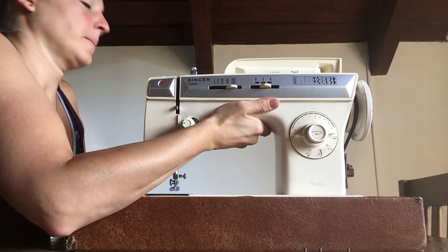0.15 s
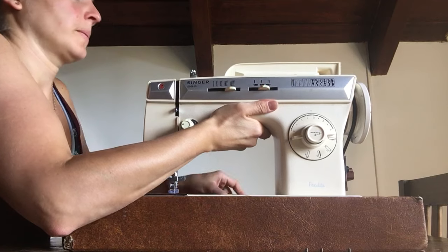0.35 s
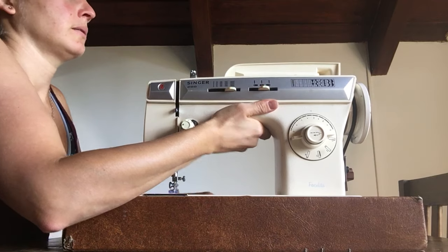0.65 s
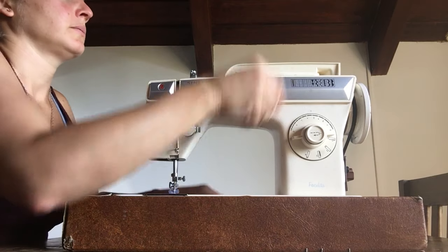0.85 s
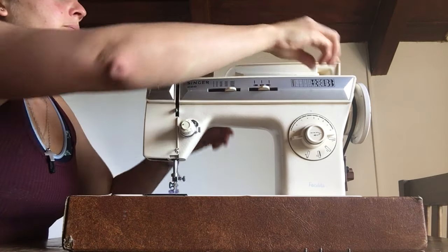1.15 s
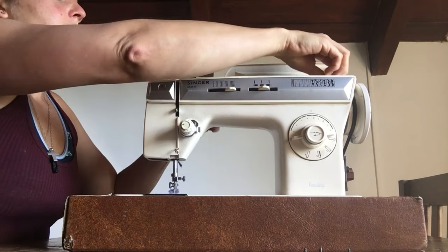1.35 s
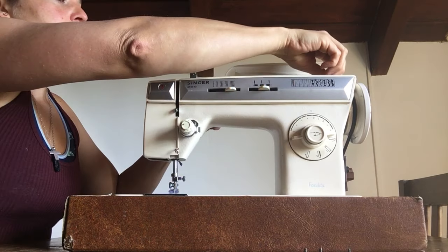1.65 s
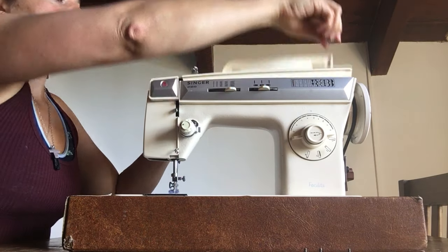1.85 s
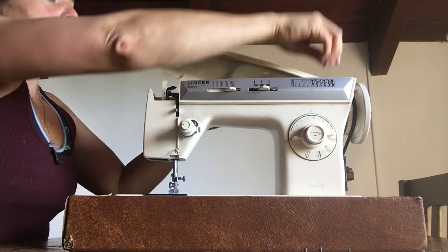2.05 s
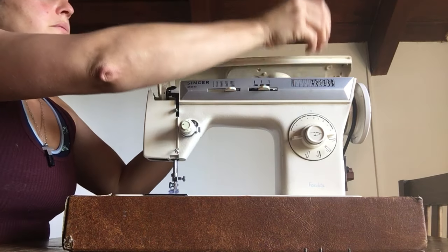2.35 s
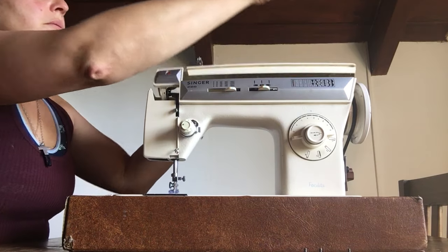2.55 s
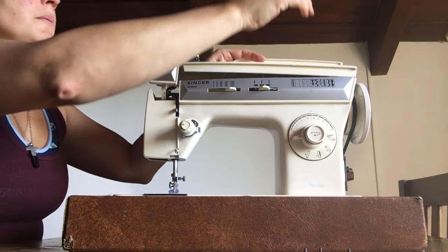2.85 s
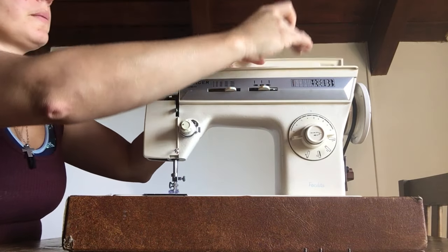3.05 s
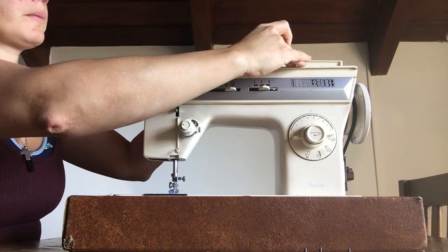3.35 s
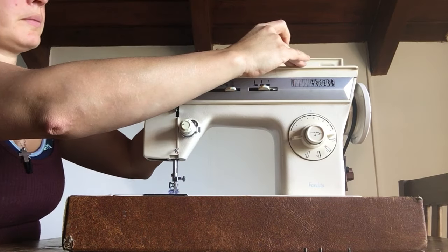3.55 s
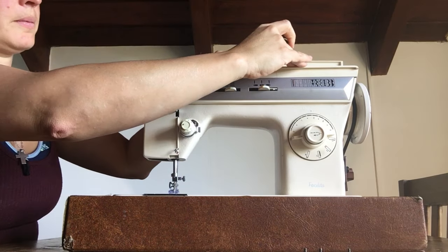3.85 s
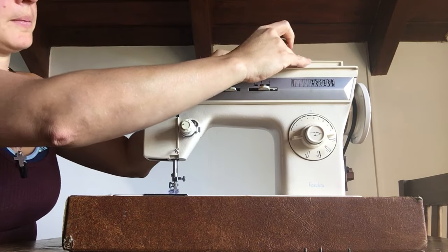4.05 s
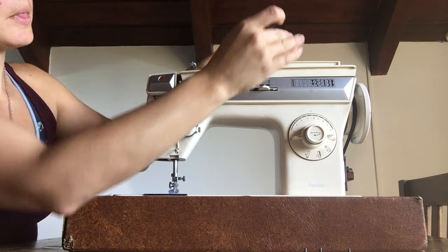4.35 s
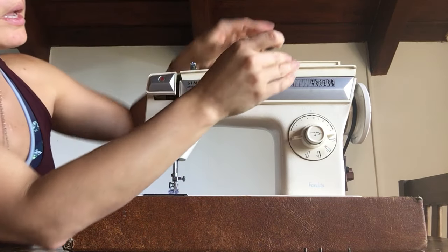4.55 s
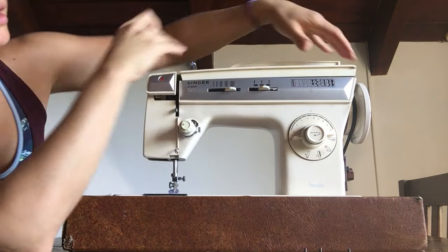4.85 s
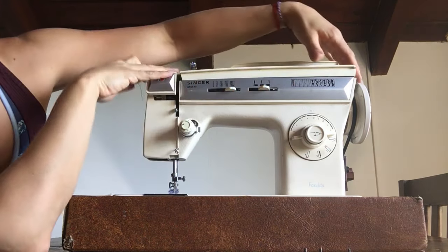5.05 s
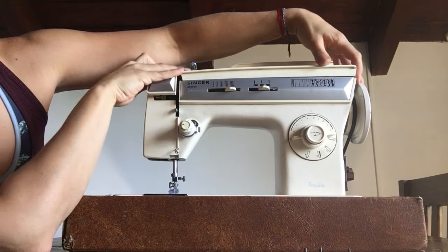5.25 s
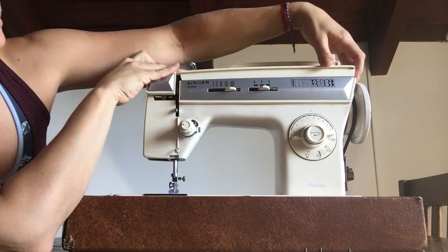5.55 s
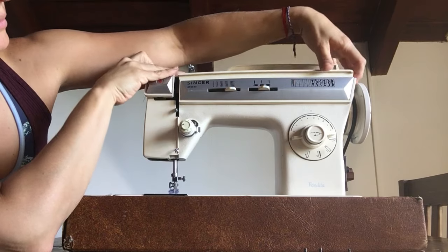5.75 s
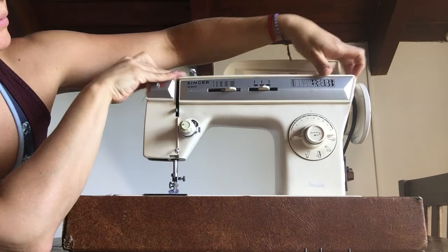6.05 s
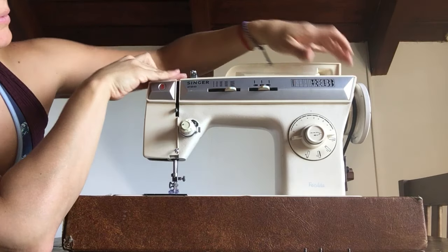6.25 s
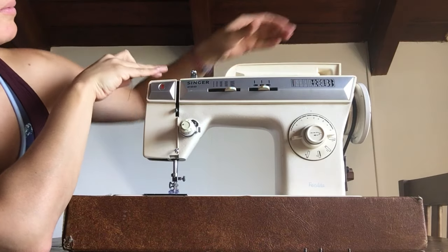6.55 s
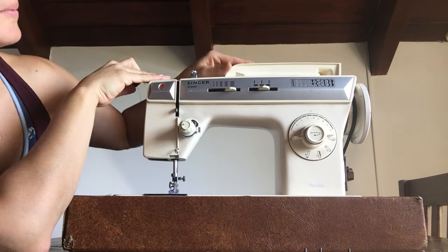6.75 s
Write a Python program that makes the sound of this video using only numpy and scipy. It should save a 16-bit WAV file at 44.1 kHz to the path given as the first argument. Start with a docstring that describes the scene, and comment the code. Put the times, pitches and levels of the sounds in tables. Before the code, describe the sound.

Mono phone-like pickup near a sewing machine, motor silent. First come a woody thump and a strong double metallic knock with short ringing; next a dry, rattling plastic drag with hard clacks. Sparse, soft ticks and brief scuffs follow, then quiet, a few clicks, and one crisp closing snap. Short room echoes and a very low hum surround it all.

```python
"""Sewing machine handled on a table

A household sewing machine, motor off, stands on a wooden table in a small, bare room. The presser-foot
lever knocks up and drops; the plastic cover is dragged, clicks under the fingers and finally snaps home.
Knocks and clicks are decaying modes in a burst of noise, rubs and drag are stick-slip friction, table and
machine base boom low, and a metal part sings faintly. Room echoes, air noise and mains hum surround them."""
import sys
import numpy as np
from scipy import signal
from scipy.fft import rfft, irfft
from scipy.io import wavfile

SR = 44100
rng = np.random.default_rng(int(sys.argv[2]) if len(sys.argv) > 2 else 0)


def store_wav(level_fs):
    """Save 16-bit WAV to argv[1]."""
    pcm = np.round(np.clip(np.atleast_2d(level_fs), -1, 1) * 32767)
    wavfile.write(sys.argv[1], SR, pcm.T.astype(np.int16))


N = 304187

# presser-foot lever and bar ticking and hitting their stops, before the gains in lever():
# (time [s], mid [dB], bass, treble and top against mid [dB], favoured resonance [Hz])
LEVER_KNOCKS = [(0.128, -55.5, 4.5, -37, -21, 1280), (0.271, -51, 5.5, -12, -6.5, 939),
                (0.322, -33.5, -1.5, -20.5, -30, 515), (0.332, -33.5, 7.5, -7, -24.5, 534),
                (0.34, -27, -4.5, -14.5, -20, 546.4), (0.371, -38.5, 9.5, -9.5, -20, 1330),
                (0.56, -66, -0.5, -2.5, 3, 1270), (0.7728, -21, -9.5, -19.5, -42.5, 1218),
                (0.7935, -21.5, -15.5, -27.5, -43.5, 1029), (0.8, -26, -2.5, -15, -45, 516),
                (0.847, -35, 4, -34.5, -51, 1040)]
# plastic cover and its catches hitting the casing, before the gains in cover_clicks():
# (time [s], mid [dB], hardness as treble against mid [dB], low ring [Hz], high ring [Hz])
COVER_CLICKS = [(1.349, -48, -12, 662, 3020), (1.749, -49, -19, 578, 3120), (1.775, -42, 0.5, 630, 3650),
                (1.801, -40.5, 5, 745, 2440), (1.833, -33, -19, 984, 3160), (1.927, -24, -1, 1200, 3100),
                (1.984, -26.5, -8, 880, 2450), (2.037, -33, 2, 724, 3730), (2.162, -31, -3, 1040, 2470),
                (2.283, -37, -7, 940, 2440), (2.384, -39.5, -13, 1223, 2850), (2.465, -51.5, 0, 930, 2260),
                (2.655, -53.5, 1, 775, 3270), (2.671, -49, 0.5, 1650, 2140),
                (2.723, -49.5, -6.5, 784, 2420), (2.783, -51, -3, 750, 2410), (2.941, -42, -4, 1056, 2090),
                (3.043, -56.5, -11, 767, 2340), (3.084, -38.5, -12, 906, 2180), (3.12, -43, -7, 905, 2080),
                (3.224, -43.5, -7, 863, 2400), (3.48, -59.5, -2, 676, 3240), (3.588, -48, -13, 1020, 3140),
                (3.61, -54, -7.5, 1150, 2450), (3.757, -43.5, -18.5, 900, 2330),
                (3.816, -49.5, -2, 1180, 2390), (3.86, -49.5, 0, 684, 2040), (3.92, -50.5, -20, 694, 2420),
                (3.95, -52.5, -13.5, 885, 2070), (4.131, -59.5, -25, 705, 2030),
                (4.191, -61.5, -9.5, 767, 2400), (4.243, -50.5, -17.5, 935, 2000),
                (4.292, -44.5, -25, 663, 2410), (4.321, -50, -9.5, 1220, 2390), (5.201, -62, -5, 672, 2220),
                (5.241, -55, -2, 1070, 2000), (5.424, -72, 3, 890, 3660), (5.448, -52.5, -18.5, 690, 2310),
                (5.574, -57.5, -13, 920, 2180), (5.606, -52.5, -18, 620, 2030),
                (5.648, -35.5, -6, 920, 3250), (5.691, -44, -7, 940, 3200), (5.789, -52, -10.5, 1220, 2850),
                (5.832, -48, -16, 926, 2070), (5.875, -51, -22, 600, 2300),
                (5.899, -45.5, -7.5, 1240, 2315), (5.929, -38.5, -5.5, 1254, 2300),
                (5.95, -34.5, -6.5, 1036, 2380), (6.103, -53, -4.5, 900, 3140),
                (6.123, -31, -10, 760, 2830), (6.137, -25.5, -5, 1132, 2070), (6.153, -31, -3.5, 587, 3350),
                (6.804, -63, -17, 690, 2170), (6.874, -51.5, -10, 1160, 2070)]
# cover dragged over the casing: (time [s], mid before the room [dB], brightness [dB per band])
DRAG = [(1.729, -54.5, -18.5), (1.82, -38, -7), (1.91, -34, -3), (1.96, -39.5, -1.5), (2.10, -42, -1.5),
        (2.22, -48, -5.5), (2.28, -33.5, -11.5), (2.33, -48, -7), (2.38, -38, -5), (2.43, -59, -0.5),
        (2.56, -67, -4)]
# short rubs of lever, cover and fingers, before swell and room:
# (start [s], length [s], mid [dB], brightness [dB per band])
RUBS = [(0.197, 0.16, -49.5, -10.5), (0.321, 0.115, -36, -5), (0.687, 0.11, -52, -9.5),
        (0.948, 0.19, -61, -6), (3.16, 0.15, -49.5, -10), (3.423, 0.085, -58.5, -10),
        (3.791, 0.092, -41.5, -6), (4.297, 0.075, -46, -11.5), (4.845, 0.091, -69, -4.5),
        (5.063, 0.11, -76, 0), (5.28, 0.27, -67.5, -8.5), (5.611, 0.14, -42.5, -6),
        (5.85, 0.19, -48.5, -25), (6.115, 0.073, -32.5, 0)]
# low booms, thumps and fading rings of table and machine base:
# (time [s], length [s], pitch [Hz], boom level [dB])
SHUDDERS = [(0.0, 0.013, 238, -40.5), (0.029, 0.07, 238, -50.5), (0.324, 0.017, 192.5, -18),
            (0.335, 0.043, 98.5, -34.5), (0.336, 0.2, 45.6, -52), (1.949, 0.3, 84.4, -58),
            (4.347, 0.067, 110, -58), (4.693, 0.042, 108.6, -56.5), (4.732, 0.023, 93, -50.5),
            (6.144, 0.079, 45.7, -56.5), (6.15, 0.04, 287, -37), (6.157, 0.076, 89.8, -47.5)]
# modes of the metal body on its wooden base: (frequency [Hz], relative level [dB], t60 [s])
BODY_MODES = [(184, 1, .35), (203, -1, .5), (283, -3, .3), (305, 0, .35), (359, -1, .3), (532, -8, .35),
              (592, -8, .3), (680, -9, .3), (858, -4, .35), (940, -6, .4), (1028, -1, .4), (1052, -1, .35),
              (1162, 1, .35), (1206, 3, .35), (1450, -7, .4), (1739, -9, .35), (2353, -10, .2),
              (2486, -15, .35)]
# modes of the plastic cover: (frequency [Hz], relative level [dB], t60 [s])
COVER_MODES = [(283, -6, .18), (532, -7, .15), (679, 0, .18), (888, 0, .14), (945, -2, .14), (1055, 0, .16),
               (1212, 1, .16), (1550, -3, .15), (1735, -4, .14), (2078, -2, .14), (2480, 0, .15),
               (2850, -4, .12), (3185, 3, .11), (3600, -5, .08), (6700, -5, .03)]
# spectra of the weaker modes crowded between them: (frequency [Hz], relative density [dB per Hz])
BODY_COLOUR = [(40, -46), (90, -30.5), (130, -12.5), (180, 1), (350, 4), (430, -8), (550, -1.5),
               (750, -2.5), (1200, 2), (1600, -7.5), (2450, -12), (2850, -24), (4000, -25.5), (7000, -38.5),
               (16000, -61.5)]
COVER_COLOUR = [(50, -24), (100, -13.5), (200, -7.5), (300, -5), (550, -4), (950, -1), (1300, -1),
                (1850, -7.5), (3200, -4.5), (4750, -19), (6800, -18), (7800, -25), (11000, -33),
                (16000, -34.5)]
# spectrum of the still room: (frequency [Hz], relative density [dB per Hz])
STILL_COLOUR = [(15, -33), (25, -7), (53, -2.5), (70, -13), (102, -5), (195, -13), (249, -6.5), (270, -6),
                (354, -10.5), (476, -11.5), (818, -18), (911, -13.5), (1290, -18.5), (3820, -26.5),
                (16000, -44)]
# mains hum: (frequency [Hz], rms level [dB])
HUM = [(50, -80.5), (100, -73)]
# room reverberation: (frequency [Hz], t60 [s])
ROOM_T60 = [(100, 0.77), (300, 0.45), (1000, 0.5), (3000, 0.48), (7000, 0.42), (14000, 0.31)]
# first echoes from table, wall and ceiling: (nominal delay [s], gain against the direct path [ratio])
ECHOES = [(.0021, 0.21), (.0052, -0.11), (.0089, .35), (0.0142, 0.37)]
# limits between bass, mid, treble and top: (frequency [Hz])
BAND_EDGES_HZ = [400, 2000, 5000]

STILL_DB = -67
TOP_HZ = 15900
RING_S, BLOW_S = .8, .025  # length of every ring; opening stretch that sets a blow's level
T = np.arange(int(RING_S * SR)) / SR
SCATTER_DB = 2.5  # spread of the mode levels from blow to blow
# the cover rocks: its far edge lands just after the near one, a little softer
FAR_EDGE_S, FAR_EDGE_DB = .008, -8
# bass against mid and top against treble in a usual click, before the gains in cover_clicks()
CLICK_BASS_DB, CLICK_TOP_DB = -10, -6.5
# a stronger blow is shorter, so it trades bass for top
TILT_DB_PER_DB, USUAL_CLICK_DB = 0.1115, -42.5
DRAG_TOP_DB = 1  # the top against an even slope
# where a click lands picks out one low and one high resonance of the shell
PICKED_Q, PICKED_LOW_GAIN, PICKED_HIGH_GAIN = 18, 0.98, 1.8


def undb(db):
    """Logarithmic level: decibels to amplitude gain."""
    return 10 ** (np.asarray(db) / 20)


def unit(x):
    """Mean power: scale to rms 1."""
    return x / np.sqrt(np.mean(x ** 2) + 1e-30)


def unit_energy(x):
    """Total energy: scale to a summed square of 1."""
    return x / np.sqrt(np.sum(x ** 2) + 1e-30)


def fade(t60):
    """Exponential damping: decay by 60 dB in t60 seconds."""
    return np.exp(-np.log(1000) * T / t60)


def add(out, s, x):
    """Superposition: mix x into out from time s."""
    i = max(int(s * SR), 0)
    out[i:i + len(x)] += x[:len(out) - i]


def resonate(x, hz, q):
    """Resonance: keep what lies around one frequency."""
    return signal.lfilter(*signal.iirpeak(hz, q, fs=SR), x)


def colour(x, points, size=4096):
    """Minimum-phase filtering: a causal filter through (Hz, dB) points, by way of the cepstrum."""
    hz, db = np.transpose(points)
    grid = np.maximum(np.arange(size // 2 + 1) * SR / size, 1)
    cepstrum = irfft(np.log(undb(np.interp(np.log(grid), np.log(hz), db))))
    # folding the cepstrum onto positive times makes the response causal
    cepstrum[1:size // 2] *= 2
    cepstrum[size // 2 + 1:] = 0
    response = irfft(np.exp(rfft(cepstrum)))
    return signal.fftconvolve(x, response)[:len(x)]


def split(x, edges, order=4):
    """Band analysis: neighbouring causal bands, lowest first."""
    kinds = [(edges[0], "low")]
    kinds += [(pair, "band") for pair in zip(edges, edges[1:])]
    kinds += [(edges[-1], "high")]
    filters = [signal.butter(order, hz, kind, fs=SR, output="sos") for hz, kind in kinds]
    return [signal.sosfilt(sos, x) for sos in filters]


def room_tail(wet_db=-7, build_s=0.0072):
    """Reverberation: direct path, first echoes and a diffuse tail with its own decay in each band."""
    hz, t60 = np.transpose(ROOM_T60)
    bands = split(rng.standard_normal(len(T)), np.sqrt(hz[1:] * hz[:-1]))
    diffuse = sum(band * fade(t) for band, t in zip(bands, t60))
    build_up = 1 - np.exp(-(T / build_s) ** 2)
    response = undb(wet_db) * unit_energy(diffuse * build_up)
    response[0] += 1  # direct path
    for delay, gain in ECHOES:
        # the paths change with the place that sounds
        add(response, delay * rng.uniform(.75, 1.25), np.array([gain]))
    return unit_energy(response)


def in_room(x):
    """Linear propagation: sound convolved with the room's response on its way to the microphone."""
    return signal.fftconvolve(x, room_tail())[:len(x)]


def ring(modes, crowd, favoured_hz, boost, crowd_t60, modes_db, grit, rise_s):
    """Modal excitation: a blow sounds a gritty crack of crowded modes and randomly weighted strong modes."""
    chatter = rng.standard_normal(len(T)) * np.exp(grit * rng.standard_normal(len(T)))
    crack = colour(chatter * fade(crowd_t60), crowd)
    crack = crack + boost * resonate(crack, favoured_hz, 4)
    signs = rng.choice([-1, 1], len(modes))
    weights = undb(SCATTER_DB * rng.standard_normal(len(modes))) * signs
    tones = np.zeros(len(T))
    for weight, (hz, db, t60) in zip(weights, modes):
        tones += weight * undb(db) * np.sin(2 * np.pi * hz * T) * fade(t60)
    onset = 1 - np.exp(-T / rise_s)
    return (unit_energy(crack) + undb(modes_db) * unit_energy(tones)) * onset


def blows(table, strike, gain_db):
    """Impact spectrum: each blow favours its resonances and balances bass, mid, treble and top."""
    out = np.zeros(N)
    for s, mid_db, bass_db, treble_db, top_db, hz in table:
        levels = undb(mid_db + np.array([bass_db, 0, treble_db, top_db]) + gain_db)
        bands = split(in_room(strike(hz)), BAND_EDGES_HZ)
        blow = sum(level * band / np.std(band[:int(BLOW_S * SR)]) for level, band in zip(levels, bands))
        add(out, s, blow)
    return out


def still_room():
    """Stationary background: faint steady air noise and mains hum."""
    t = np.arange(N) / SR
    air = unit(colour(rng.standard_normal(N), STILL_COLOUR)) * undb(STILL_DB)
    hum = sum(undb(db) * unit(np.sin(2 * np.pi * hz * t)) for hz, db in HUM)
    return air + hum


def shudders():
    """Low-frequency resonance: table and base boom low, and their rumble dies away."""
    out = np.zeros(N)
    for s, length, hz, db in SHUDDERS:
        t = T[:int(length * SR)]
        boom = unit(np.sin(2 * np.pi * hz * t) * np.sin(np.pi * t / length))
        low_noise = colour(rng.standard_normal(len(T)), [(hz, 0), (4 * hz, -40)])
        rumble = unit(resonate(low_noise, hz, 1.5))
        add(out, s, undb(db) * boom)
        add(out, s, undb(db - 4.5) * rumble * fade(0.19) * (1 - np.exp(-T / .01)))
    return out


def lever():
    """Impact on a heavy body: the sprung presser bar knocks it and excites its modes."""
    def strike(hz):
        """Modal response: one knock rings the metal body."""
        return ring(BODY_MODES, BODY_COLOUR, hz, boost=2.7, crowd_t60=.035,
                    modes_db=-11.5, grit=0.34, rise_s=0.00056)

    # gains of bass, mid, treble and top
    return blows(LEVER_KNOCKS, strike, gain_db=np.array([0.43, 4.1, 0.46, .3]))


def friction(slips_per_s, spread_db, grip_s=.03, grip_db=4, count=8):
    """Stick-slip: spots of uneven grip ring the cover; returns mid, treble and top bands at rms 1."""
    sound, hold = 0, int(grip_s * SR)
    for hz in np.geomspace(600, 3600, count):
        grip_steps = undb(grip_db * rng.standard_normal(N // hold + 1))
        grip = np.repeat(grip_steps, hold)[:N]
        slipping = rng.random(N) < slips_per_s / count / SR
        slips = slipping * rng.choice([-1, 1], N) * undb(spread_db * rng.standard_normal(N))
        spot = ring(COVER_MODES, COVER_COLOUR, hz, boost=1.8, crowd_t60=.02,
                    modes_db=-8.5, grit=0.87, rise_s=.0001)
        sound = sound + signal.oaconvolve(slips * grip, spot)[:N]
    return [unit(band) for band in split(sound, BAND_EDGES_HZ[1:])]


def rubs():
    """Stick-slip under a passing pressure: brief scrapes swell and let go."""
    out, bands = np.zeros(N), friction(slips_per_s=1200, spread_db=1.0)
    for s, length, db, bright_db in RUBS:
        i, n = int(s * SR), int(length * SR)
        rub = sum(undb(db + k * bright_db) * unit(band[i:i + n]) for k, band in enumerate(bands))
        swell = np.sin(np.pi * np.arange(n) / n) ** 2
        add(out, s, rub * swell)
    return in_room(out)


def click_balance(s, db, hardness_db, low_hz, high_hz):
    """Contact time: strength and hardness of a click set its bass, treble and top."""
    tilt_db = TILT_DB_PER_DB * (db - USUAL_CLICK_DB)
    bass_db = CLICK_BASS_DB - tilt_db
    top_db = hardness_db + CLICK_TOP_DB + tilt_db
    return s, db, bass_db, hardness_db, top_db, (low_hz, high_hz)


def cover_clicks():
    """Impact of a light shell: one edge clacks, then the other, damped quickly and cushioned by fingers."""
    def edge(hz):
        """Cushioned contact: one edge rings the shell with a softened onset."""
        return ring(COVER_MODES, COVER_COLOUR, hz, boost=1.4, crowd_t60=0.041,
                    modes_db=-13, grit=0.95, rise_s=.0016)

    def strike(rings_hz):
        """Double impact: near and far edge, with two resonances of the shell picked out."""
        clack = edge(rings_hz[0])
        far_edge = undb(FAR_EDGE_DB) * edge(rings_hz[0])
        add(clack, FAR_EDGE_S * rng.uniform(0.56, 1.3), far_edge)
        low, high = [resonate(clack, hz, PICKED_Q) for hz in rings_hz]
        return clack + PICKED_LOW_GAIN * low + PICKED_HIGH_GAIN * high

    table = [click_balance(*row) for row in COVER_CLICKS]
    # gains of bass, mid, treble and top
    return blows(table, strike, gain_db=np.array([0.16, 0.46, 0.057, 0.2]))


def cover_drag():
    """Sliding friction: the cover scrapes the casing, louder as it bears down, brighter as it slides freely."""
    t = np.arange(N) / SR
    s, db, bright_db = np.transpose(DRAG)
    pressure = undb(np.interp(t, s, db, left=-120, right=-120))
    bright = undb(np.interp(t, s, bright_db))
    mid, treble, top = friction(slips_per_s=700, spread_db=3)
    scrape = mid + bright * treble + bright ** 2 * undb(DRAG_TOP_DB) * top
    return in_room(pressure * scrape)


def loose_part():
    """Free vibration: a small metal part sings faintly at one pitch with exponential decay."""
    out = np.zeros(N)
    tone = np.sin(2 * np.pi * 777 * T)
    add(out, 2.70, undb(-49.5) * tone * fade(1.0) * (1 - np.exp(-T / 0.0053)))
    return out


def scene():
    """Superposition: lever, cover, table and loose part over the quiet of the room."""
    handling = lever() + rubs() + cover_clicks() + cover_drag()
    mix = still_room() + shudders() + handling + loose_part()
    return mix[None]  # one channel


def record(dry):
    """Band limitation: the phone cuts the highest treble with a steep elliptic low-pass."""
    return signal.sosfilt(signal.ellip(10, .2, 80, TOP_HZ, fs=SR, output="sos"), dry)


dry = scene()
out = record(dry)
store_wav(out)
```